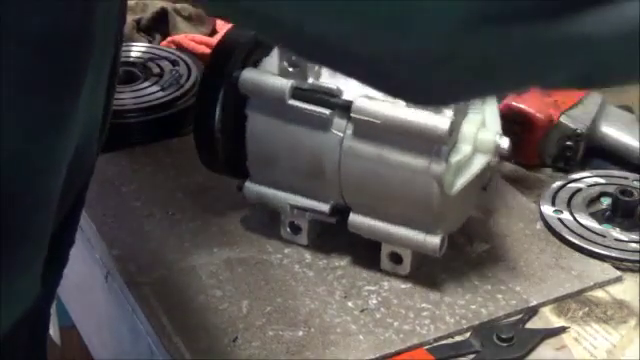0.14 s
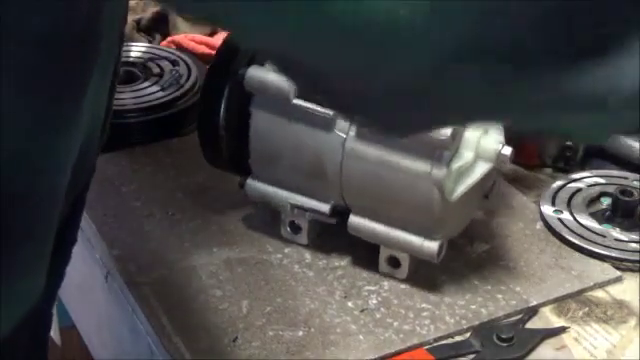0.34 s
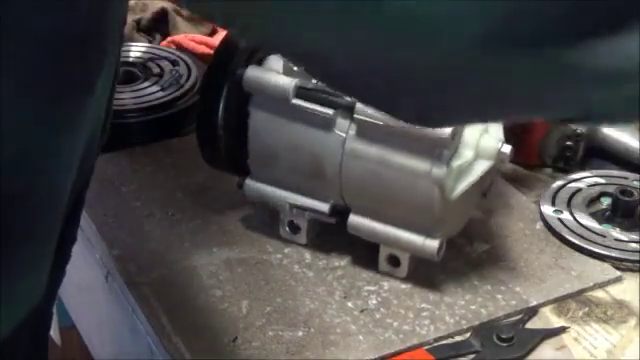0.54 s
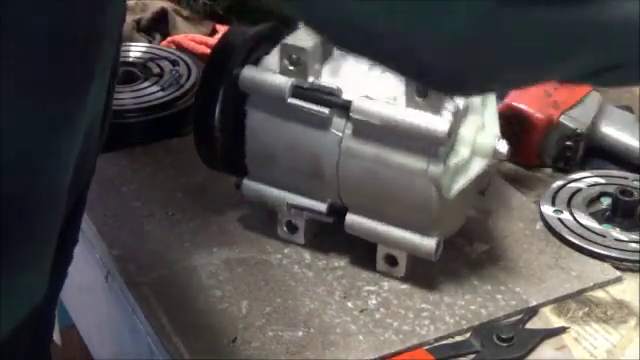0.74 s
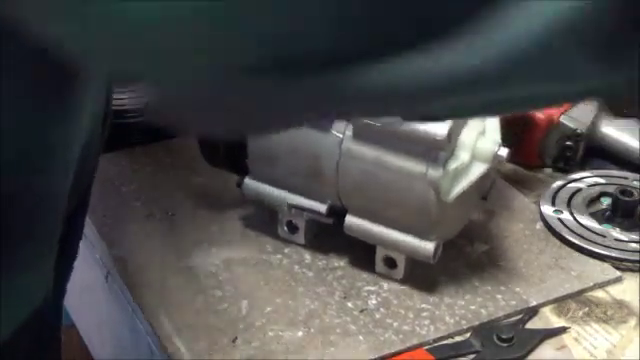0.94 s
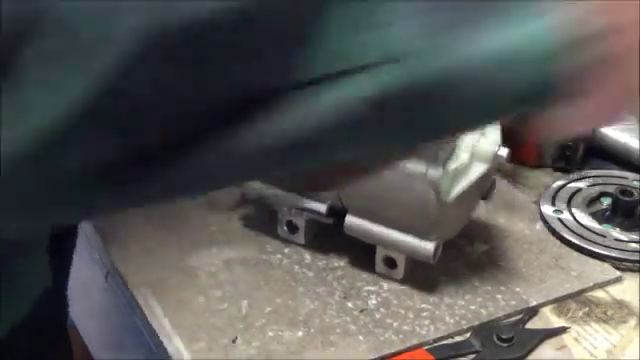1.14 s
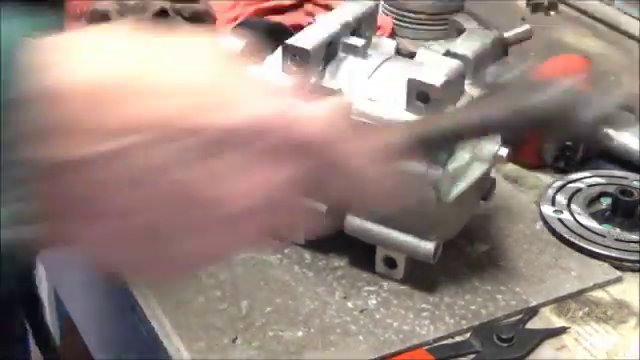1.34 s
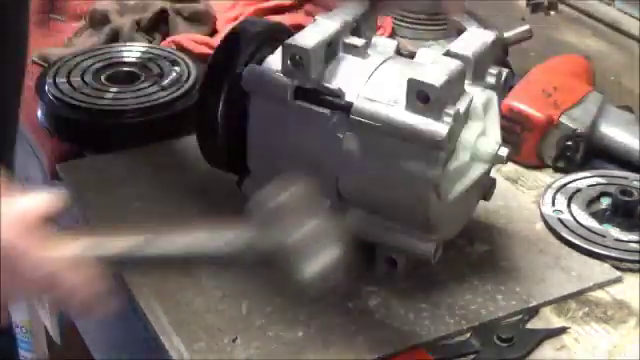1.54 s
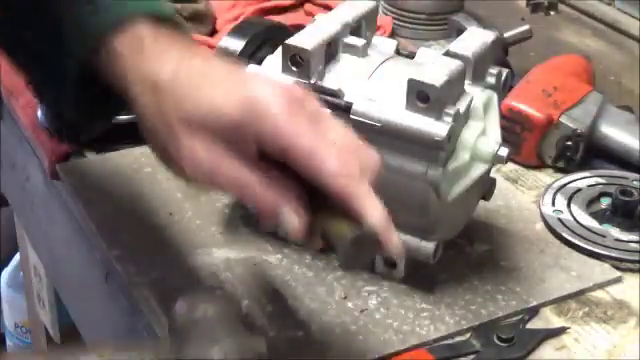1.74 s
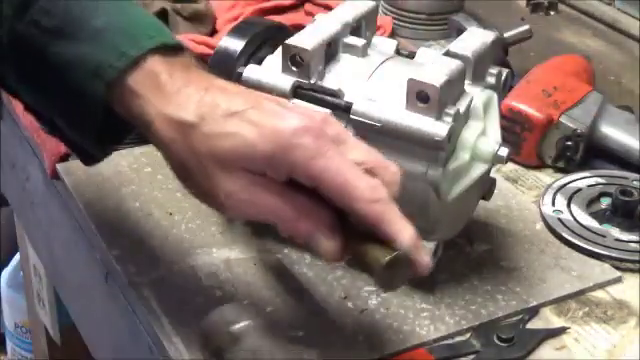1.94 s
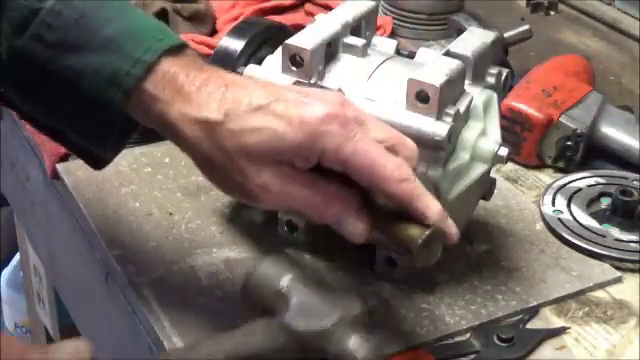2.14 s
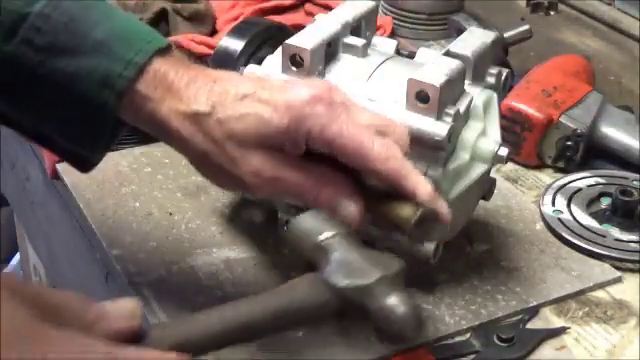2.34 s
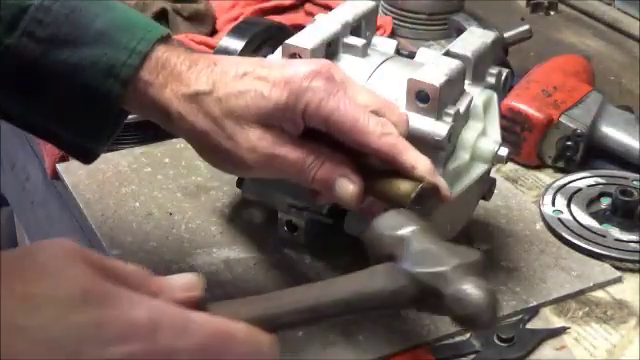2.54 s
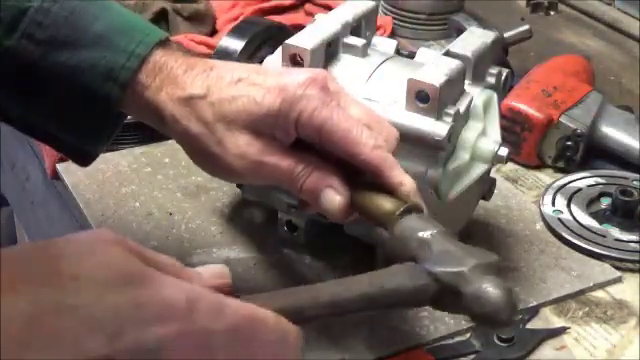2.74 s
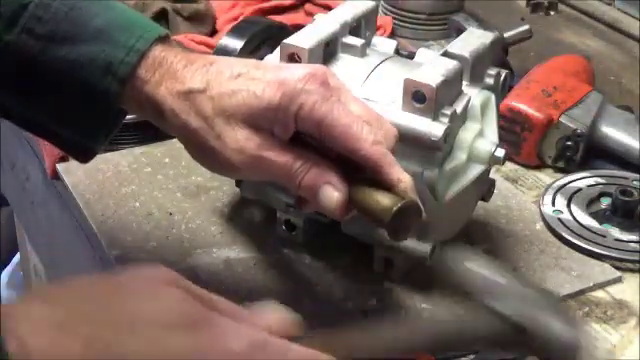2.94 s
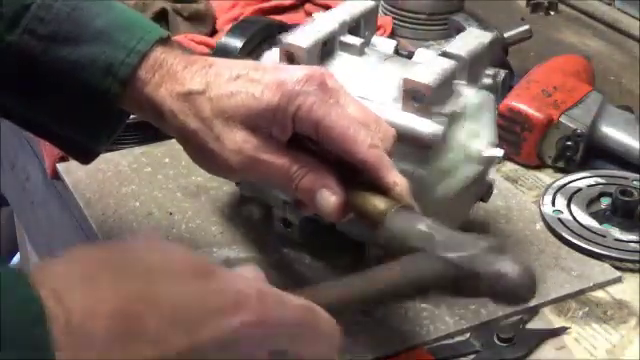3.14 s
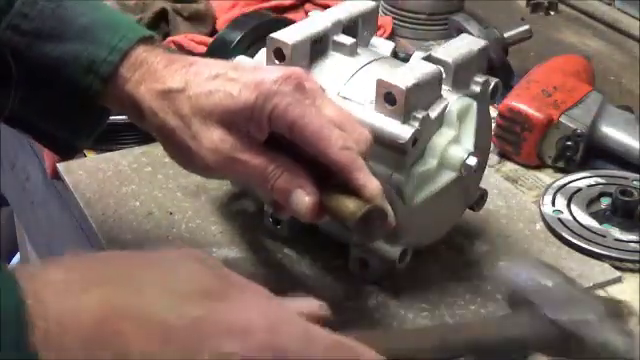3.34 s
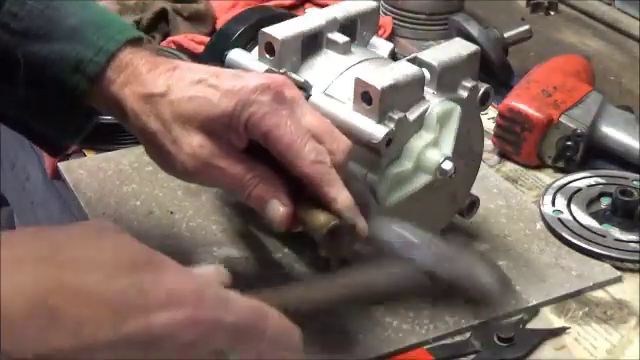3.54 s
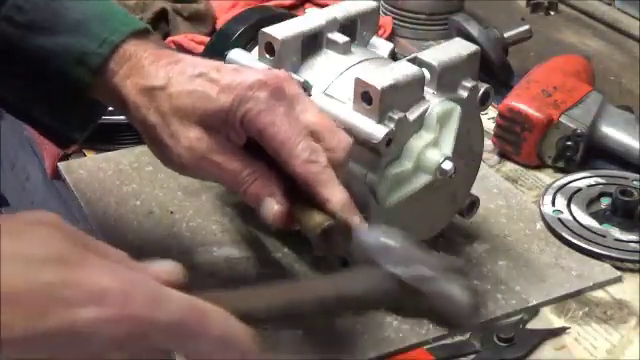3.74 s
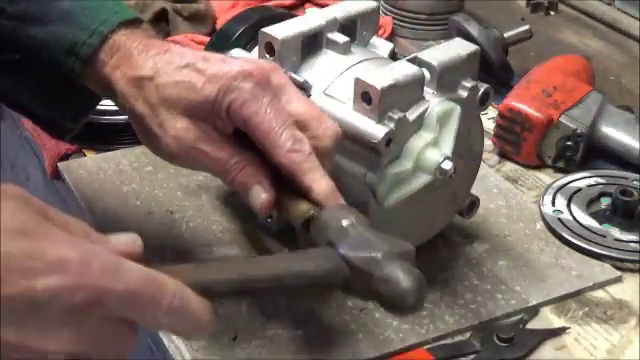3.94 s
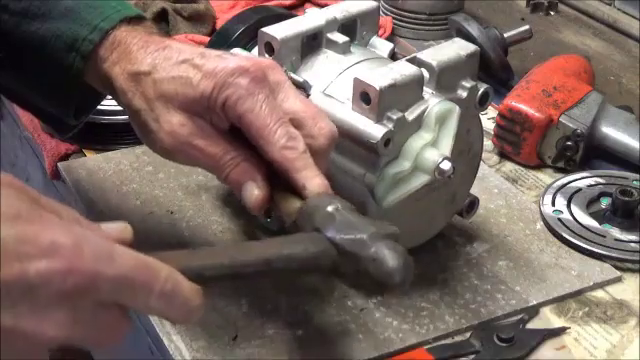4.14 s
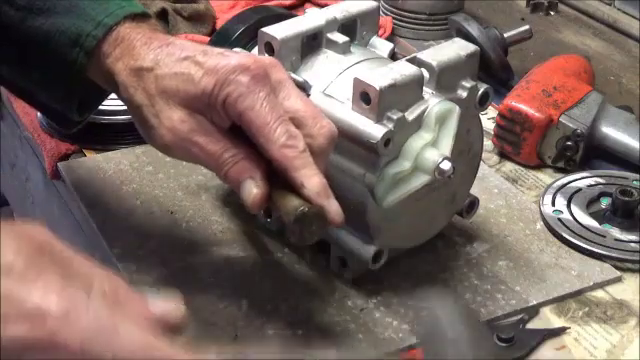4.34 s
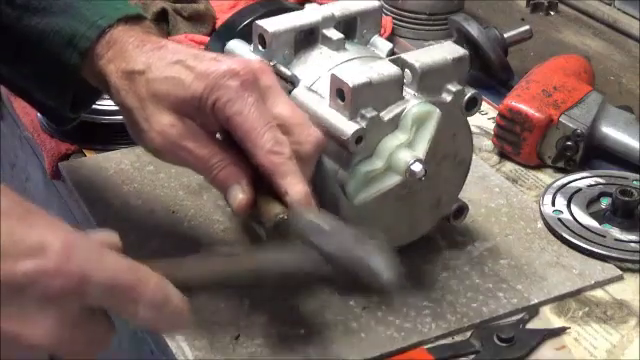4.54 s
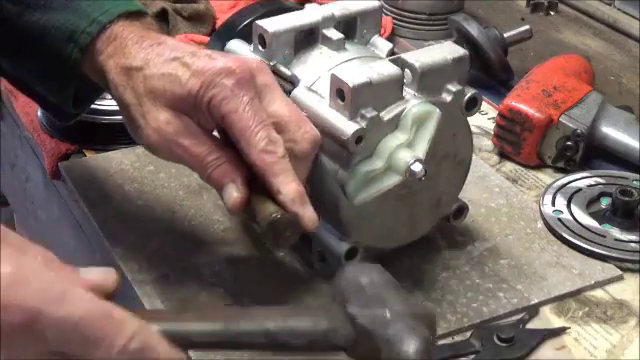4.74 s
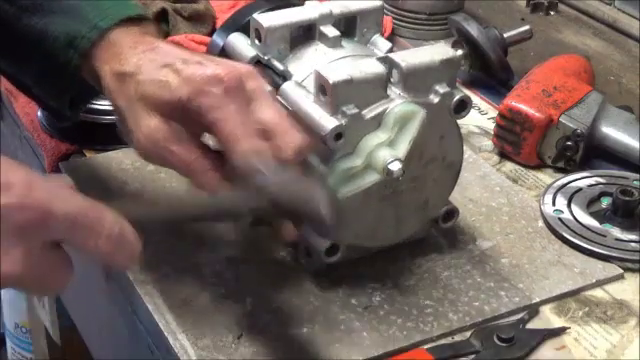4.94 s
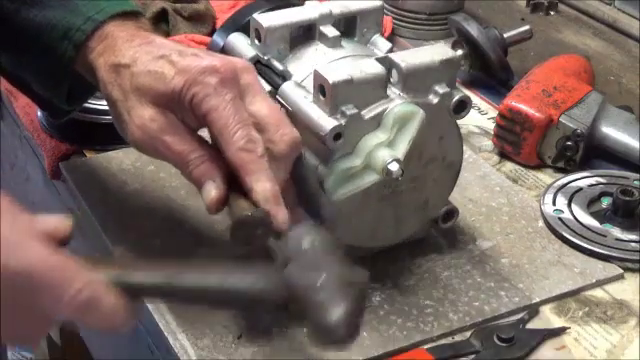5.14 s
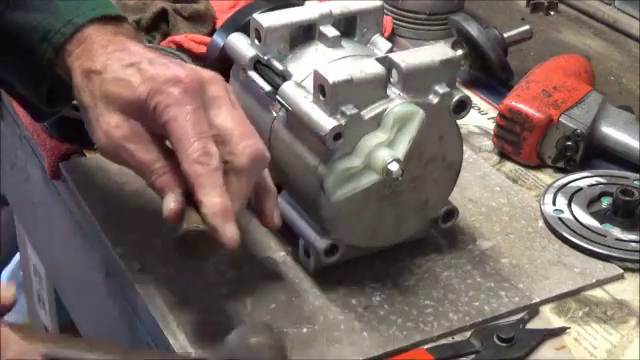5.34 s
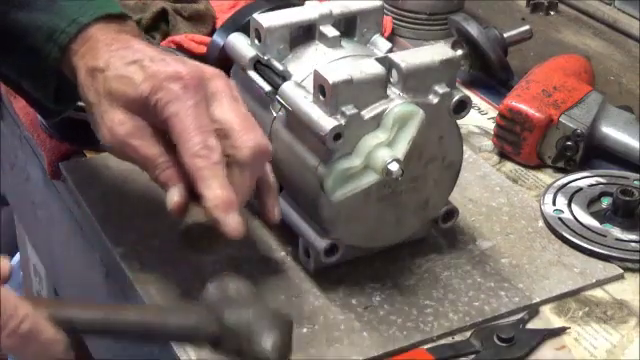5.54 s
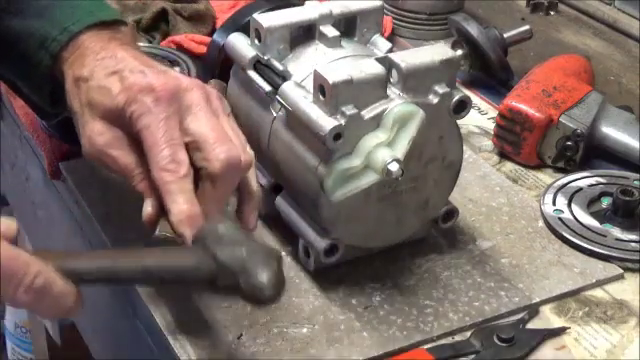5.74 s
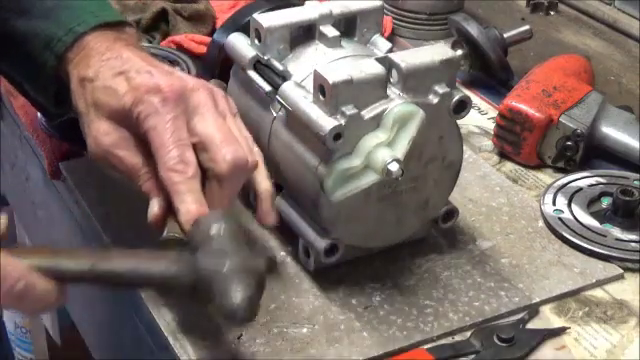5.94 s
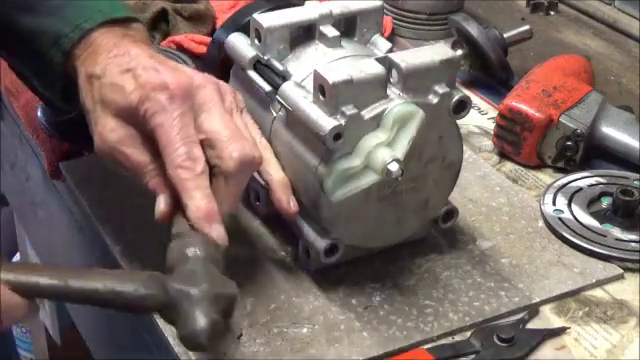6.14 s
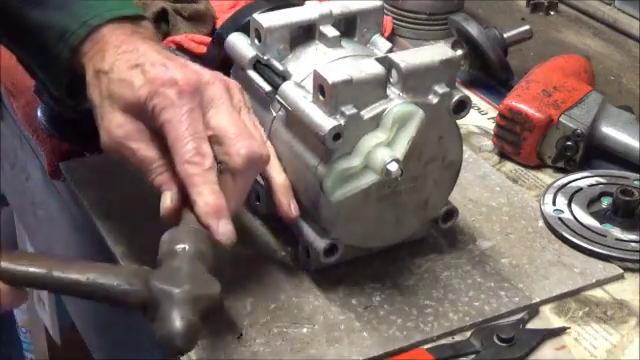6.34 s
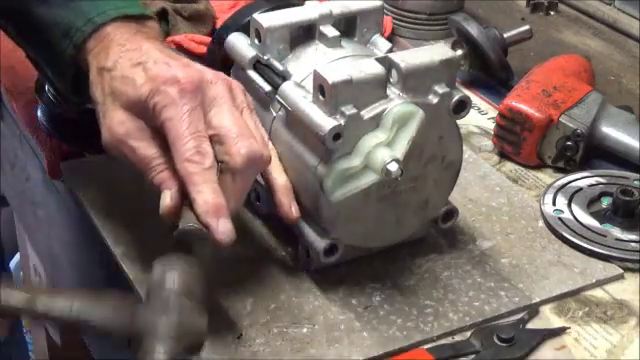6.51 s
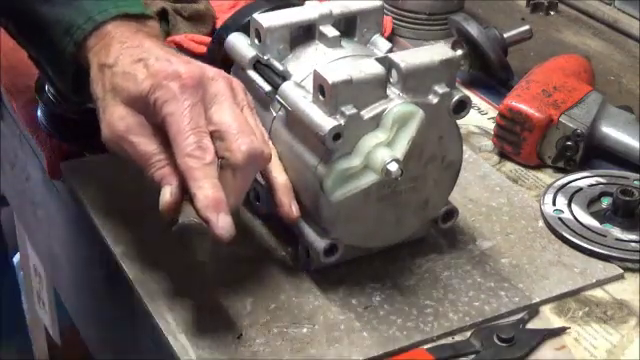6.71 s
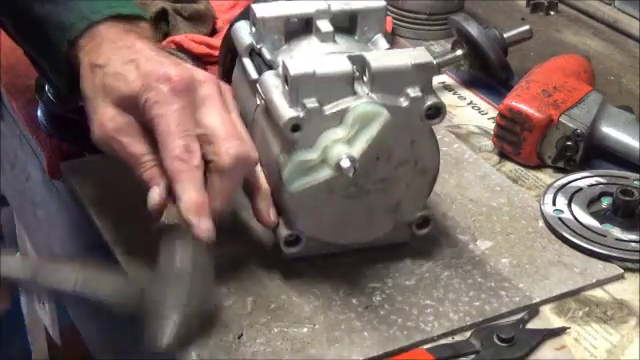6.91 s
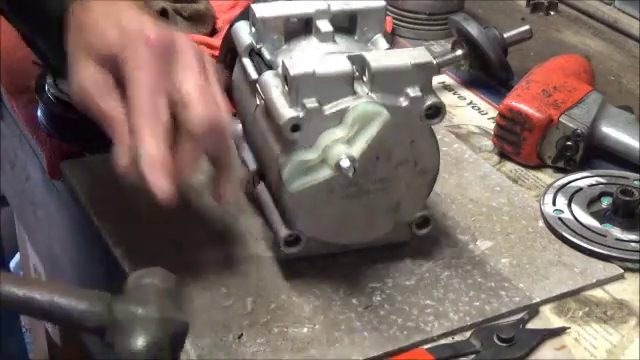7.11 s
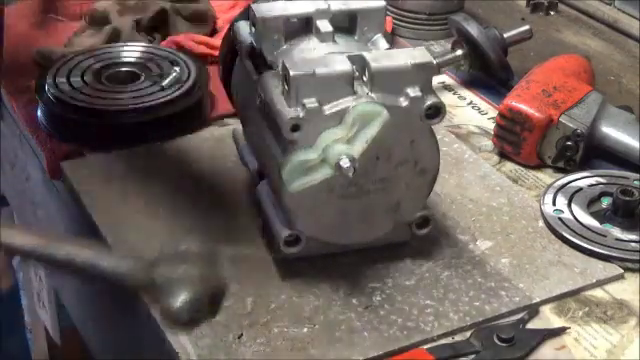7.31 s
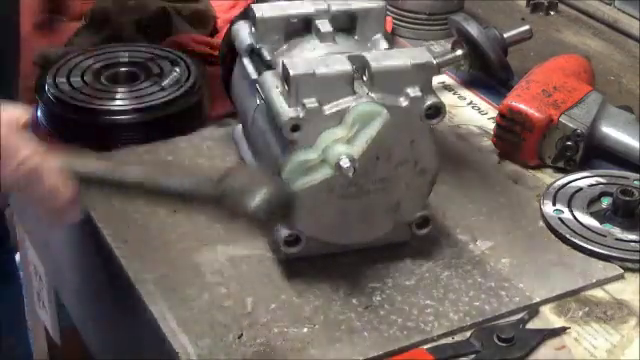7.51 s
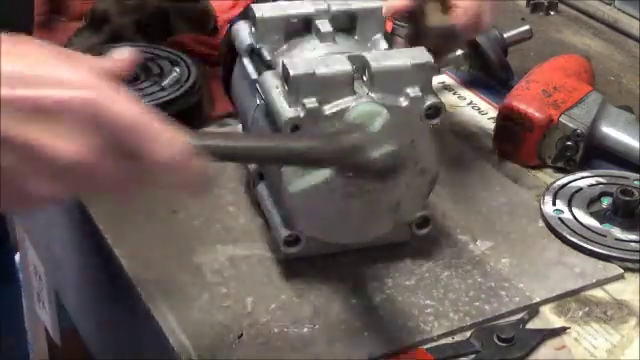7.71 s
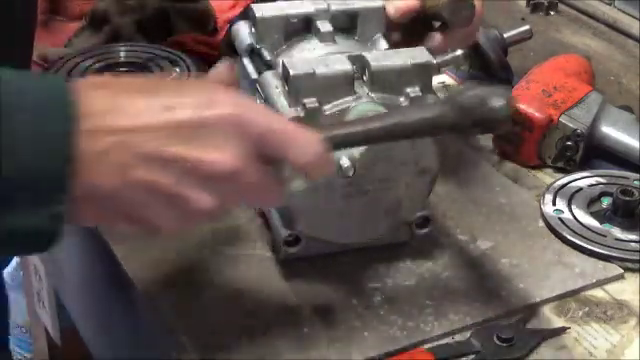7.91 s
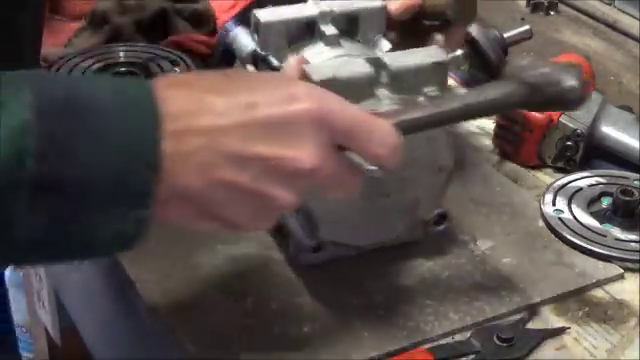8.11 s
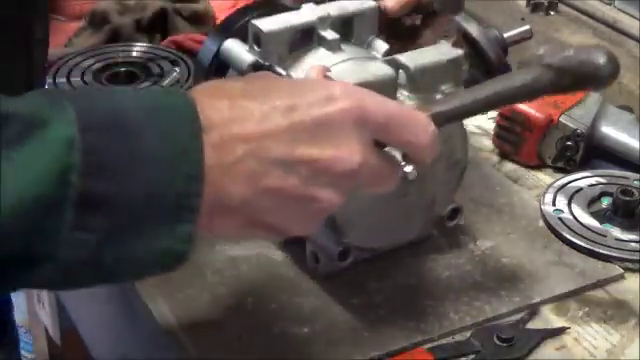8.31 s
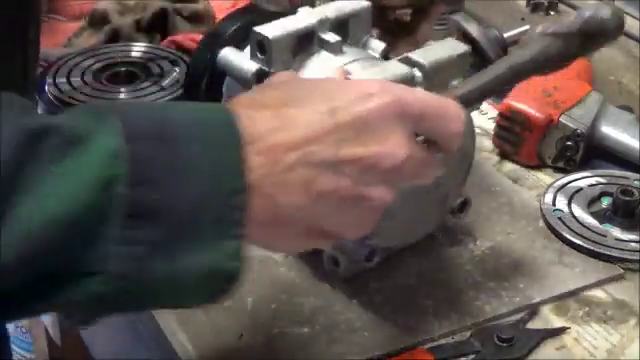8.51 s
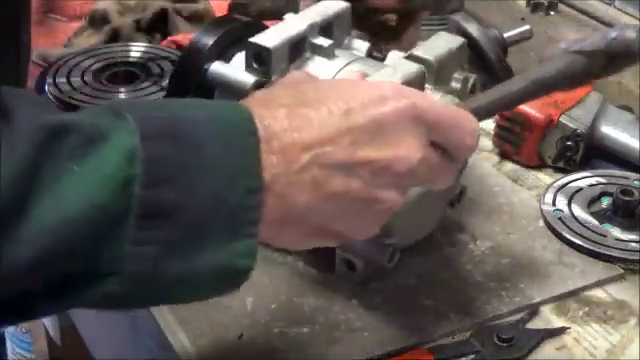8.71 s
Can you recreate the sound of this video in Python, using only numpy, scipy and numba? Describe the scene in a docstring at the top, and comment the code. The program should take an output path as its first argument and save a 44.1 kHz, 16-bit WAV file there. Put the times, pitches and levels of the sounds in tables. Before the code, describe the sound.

A steel hammer strikes a hand-held brass punch against an aluminium housing, each blow a sharp clack with a short, high ring. Three quick blows come first, then a pause with faint handling, then uneven hard and light taps. The housing knocks on the bench and sleeves rustle softly. Finally the housing is shoved along with a scrape. The sound is close, in a small workshop with a soft rush of air.

```python
"""In a workshop, a steel hammer taps a hand-held brass punch against an aluminium compressor housing.
Each impact excites the housing's dense, damped modes (a clack) and the punch's sparse ones (a ring);
a steel pulley rings with the early blows. The housing knocks on the bench, sleeves rustle, the grip ticks,
the punch scrapes and at last the housing is shoved along, all over a soft rush of air and a low hum.
A fast limiter flattens the hard blows, so the room swells up behind them as it lets go."""
import sys
import numpy as np
from scipy import signal
from scipy.fft import rfft, irfft, next_fast_len
from scipy.io import wavfile
from scipy.ndimage import minimum_filter1d
from numba import njit

SR = 44100
rng = np.random.default_rng(int(sys.argv[2]) if len(sys.argv) > 2 else 0)


def wrap_up_sound(samples):
    """Save the sound to the file named by the first command line argument, as 16-bit audio."""
    columns = np.atleast_2d(samples).T
    # keep every value between -1 and 1, then stretch to whole-number steps
    tamed = np.clip(columns, -1, 1)
    steps = np.round(tamed * 32767).astype(np.int16)
    wavfile.write(sys.argv[1], SR, steps)


N = 386757
TIME = np.arange(N) / SR
AGE = TIME[:SR // 2]  # seconds since an impact


def from_db(db):
    """Amplitude ratio: a factor of ten per 20 dB."""
    return 10 ** (np.asarray(db) / 20)


def rms_one(x):
    """Normalisation to unit mean power."""
    return x / np.sqrt(np.mean(x ** 2) + 1e-20)


def at_hz(points, hz):
    """Interpolation of (frequency_hz, value) points on a logarithmic frequency axis."""
    known_hz, values = np.transpose(points)
    return np.interp(np.log(hz + 1e-6), np.log(known_hz), values)


def noise(spectrum, size):
    """Random phases under a given magnitude spectrum make steady noise; rms 1."""
    hz = np.arange(size // 2 + 1) * SR / size
    phasors = np.exp(2j * np.pi * rng.random(len(hz)))
    return rms_one(irfft(from_db(at_hz(spectrum, hz)) * phasors, size))


# Stereo width of diffuse sound, side re mid: frequency_hz, side_db
DIFFUSE_WIDTH = [(100, -36), (250, -22.5), (500, -15.5), (1000, -11), (2500, -7.5), (8000, -10.5),
                 (15000, -20.5)]

def diffuse(spectrum, size):
    """Diffuse field: noise from all round is alike in both channels in the bass, less so in the treble."""
    length = next_fast_len(size, True)
    hz = np.arange(length // 2 + 1) * SR / length
    side = irfft(rfft(noise(spectrum, length)) * from_db(at_hz(DIFFUSE_WIDTH, hz)), length)
    return (noise(spectrum, length) + side * np.array([[1], [-1]]))[:, :size]


def flutter(per_s, size=N):
    """Random modulation: straight lines between standard normal values."""
    knots = np.arange(0, size / SR + 1, 1 / per_s)
    return np.interp(TIME[:size], knots, rng.standard_normal(len(knots)))


def fade(t60):
    """Exponential damping: the amplitude falls 60 dB in t60 seconds."""
    return np.exp(-np.log(1000) * AGE / max(t60, 1e-4))


def ring(modes):
    """Free vibration: one damped sine for each (pitch_hz, level_db, t60_s) row."""
    return sum(from_db(db) * fade(t60) * np.sin(2 * np.pi * hz * AGE) * rng.choice([-1, 1])
               for hz, db, t60 in modes)


def soft_contact(hz, bright_hz):
    """A contact of finite duration is a low-pass filter: it excites little above bright_hz."""
    return 1 / np.sqrt(1 + (hz / bright_hz) ** 4)


def burst(spectrum, bright_hz, t60):
    """Modal overlap: countless modes struck at once merge into dying noise, starting near rms 1."""
    hz = np.arange(len(AGE) // 2 + 1) * SR / len(AGE)
    phases = np.angle(rfft(rng.standard_normal(len(AGE)) * fade(t60)))
    magnitudes = from_db(at_hz(spectrum, hz)) * soft_contact(hz, bright_hz)
    dying = irfft(magnitudes * np.exp(1j * phases), len(AGE)) * fade(10 * t60)
    return rms_one(dying) * np.sqrt(np.mean(fade(t60) ** 2))


def resonate(x, hz, width_hz):
    """Forced response of one resonance, with unit gain at its peak."""
    return signal.lfilter(*signal.iirpeak(hz, hz / width_hz, fs=SR), x)


def strokes(rows):
    """Incoherent sounds add in power: the joint gain of strokes that swell, hold and die away."""
    power = np.zeros(N)
    for start_s, rise_s, hold_s, release_t60, db in rows:
        swell = np.clip((TIME - start_s) / max(rise_s, 1e-3), 0, 1) ** 2
        let_go = np.clip((TIME - start_s - rise_s - hold_s) / max(release_t60, 1e-3), 0, 2)
        power += (swell * from_db(db - 60 * let_go)) ** 2
    return np.sqrt(power)


def add(track, start_s, sound):
    """Superposition of a sound on the track; one that starts before zero leaves only its tail."""
    start = round(start_s * SR)
    sound, start = sound[..., max(-start, 0):], max(start, 0)
    track[..., start:start + sound.shape[-1]] += sound[..., :N - start]


# Reverberation time of the workshop: frequency_hz, t60_s
REVERB_TIMES = [(100, 0.36), (500, 0.38), (2000, 0.29), (5000, 0.27), (9000, 0.27), (15000, 0.16)]

def room(x, first_echo_s=0.0091, build_s=0.00067):
    """Reverberation: dense echoes build up fast and die sooner in the treble; new ones at each call."""
    spectrum = rfft(diffuse([(20, 0), (20000, 0)], len(AGE)))
    hz = np.arange(spectrum.shape[1]) * SR / len(AGE)
    centres_hz = np.array(REVERB_TIMES)[:, 0]
    echoes = 0
    for (_, t60), weights in zip(REVERB_TIMES, np.eye(len(centres_hz))):
        band = irfft(spectrum * at_hz(np.c_[centres_hz, weights], hz), len(AGE))
        echoes = echoes + band * fade(t60)
    onset = 1 - np.exp(-np.maximum(AGE - first_echo_s, 0) / build_s)
    response = rms_one(echoes * onset) / np.sqrt(len(AGE))
    return signal.fftconvolve(x[None], response, axes=1)[:, :len(x)]


def lingering(hz, t60, waver_db=5.5, waver_rad=1.3, spread_rad=0.55):
    """Interference: the echoes of a pure ring pile up, waver and die with the room."""
    room_t60 = at_hz(REVERB_TIMES, hz)
    t60 = min(t60, room_t60 / 2)
    piled = np.sqrt(np.abs(fade(room_t60) ** 2 - fade(t60) ** 2) * t60 / (room_t60 - t60))
    swell, drift, apart = (flutter(per_s, len(AGE)) for per_s in (90, 45, 40))
    phase = 2 * np.pi * hz * AGE + waver_rad * drift + spread_rad * apart * np.array([[1], [-1]])
    return piled * from_db(waver_db * swell) * np.cos(phase)


# Spectrum of the struck housing: frequency_hz, level_db
CLACK_SPECTRUM = [(60, -46), (300, -23), (600, -9), (1200, -8.5), (1900, -0.5), (3500, 5.5), (4400, -1),
                  (5200, 4), (6900, -4.5), (9300, 4.5), (10600, -5), (12800, -1.5), (13400, -34),
                  (16000, -32)]
# Weaker modes of punch and hammer head, re the clack: pitch_hz, level_db, t60_s
WEAK_MODES = [(2768, -18, .06), (5130, -22, .025), (7580, -17, .015), (8475, -18, .05), (8570, -15, .05),
              (9720, -17, .02), (11730, -29, .035), (12270, -24, .045)]
# Modes of the bench top: pitch_hz, level_db, t60_s
BENCH_TOP_MODES = [(78, -34.5, .15), (134.7, -2.5, 0.047), (200, -30, 0.056), (263, -15, 0.19)]

def housing_clack(blow_db, clack_t60=0.027, contact_s=0.00095, thump_db=-43.5):
    """Impact excitation of housing, tools and bench: a harder blow is shorter in contact, so brighter."""
    bright_hz = 10000 * 2 ** ((blow_db - 8.5) / 19)  # an octave higher per 19 dB
    weak = [(hz, db + 20 * np.log10(soft_contact(hz, bright_hz)), t60) for hz, db, t60 in WEAK_MODES]
    contact = (1 - np.exp(-AGE / contact_s)) ** 2  # the force swells as the face flattens on the brass
    housing = burst(CLACK_SPECTRUM, bright_hz, clack_t60)
    return (housing + ring(weak) + from_db(thump_db) * ring(BENCH_TOP_MODES)) * contact


def gripped_mode(hz, t60, after_t60, after_db=-39, bloom_s=0.0022, detune=0.00032, room_db=-12.0):
    """Damping: the grip shortens and slightly detunes a mode; a faint ring escapes, and echoes linger."""
    hz = hz * (1 + detune * rng.normal())
    dying = fade(t60) + from_db(after_db) * fade(after_t60)
    direct = (1 - np.exp(-AGE / bloom_s)) * dying * np.sin(2 * np.pi * hz * AGE)
    return direct + from_db(room_db) * lingering(hz, t60)


# Bending modes of the punch: pitch_hz, level_db, t60_ratio (re grip_t60_s)
PUNCH_BENDING = [(2792, -10, 1.42), (5322, 0, 1.23), (8512, -5, 1.15)]
# The punch's lengthwise mode, then the hammer head's ping: pitch_hz, t60_ratio
LENGTHWISE_AND_HEAD = [(6371, 1.34), (12702, 0.6)]
# Blows on the punch, with mode levels re the clack:
# start_s, level_db, grip_t60_s, bending_db, tilt_db_per_octave, lengthwise_db, head_db
HAMMER_BLOWS = [ (-0.135, 8, 0.067, -6, 6, -6, -12), (0.1418, 5.5, 0.055, -3.5, 11, -0.5, 2),
                (0.41, 7.5, .085, -.5, 0.5, -15, -11), (0.6756, 6, 0.078, 0.5, 8, -15.5, -15.5),
                (1.966, -36, 0.052, 6.5, -7, -26, -18), (2.095, -46, 0.036, 4.5, -14, -14, -18),
                (2.195, -41, 0.03, 3, -13, -6, -22), (2.7962, -8.5, 0.048, -2.5, -13, -31.5, -8),
                (3.1721, 9.5, 0.14, -4, 8, -21.5, -23), (3.4599, 9.5, 0.16, 1, 3.5, -20.5, -10),
                (3.9594, -25.5, 0.054, -20, -8, -36, -31), (4.0538, -11.5, 0.12, -12, -6.5, -34, -22),
                (4.497, 15, 0.11, -8, 8.5, -8.5, -16), (4.9391, 11, 0.13, 0, 0.5, -20.5, -20.5),
                (5.55, -31, .12, -23, 12, -25, -40), (6.218, -19.5, 0.031, 0, -13, -26, -22),
                (6.8132, 16, 0.062, -6.5, -2.5, -5.5, -7.5)]

def hammer_blows(room_db=-8.0, after_t60=0.35):
    """Modal superposition: each blow is a clack and a ring; where the face lands sets the modes' mix."""
    out = np.zeros((2, N))
    middle_hz = PUNCH_BENDING[1][0]
    for start_s, db, grip_t60, bending_db, tilt_db, *single_db in HAMMER_BLOWS:
        clack = housing_clack(db)
        # arms and hammer move between blows, so each has echoes of its own
        blow = clack + from_db(room_db) * room(clack)
        modes = [(hz, mode_db + bending_db + tilt_db * np.log2(hz / middle_hz), ratio)
                 for hz, mode_db, ratio in PUNCH_BENDING]
        modes += [(hz, mode_db, ratio) for (hz, ratio), mode_db in zip(LENGTHWISE_AND_HEAD, single_db)]
        for hz, mode_db, ratio in modes:
            blow += from_db(mode_db) * gripped_mode(hz, grip_t60 * ratio, after_t60 * ratio)
        add(out, start_s, from_db(db) * blow)
    return out


# Level of the workshop air: time_s, level_db
AIR_LEVELS = [(0.0, -44), (0.39, -47), (1.05, -51.5), (2.02, -50), (2.69, -46.5), (3.37, -49.5),
              (3.69, -53), (4.57, -47), (4.96, -45.5), (5.2, -50), (6.1, -50), (6.81, -43.5), (7.11, -46.5),
              (8.57, -41), (8.77, -43)]
# Spectrum of the air: frequency_hz, level_db
AIR_SPECTRUM = [(15, -85.5), (25, -63), (120, -10), (157, -15), (236, -11.5), (309, -13.5), (476, -9.5),
                (545, -11.5), (677, -4), (1020, 1), (1130, 0.5), (2000, -4), (5000, -24), (11000, -30),
                (16000, -50.5)]

def workshop_air(hum_hz=128.5, hum_db=-73.5):
    """Ambient noise: a diffuse mid-range rush and a faint, low pure tone."""
    rush = from_db(np.interp(TIME, *np.transpose(AIR_LEVELS))) * diffuse(AIR_SPECTRUM, N)
    return rush + from_db(hum_db) * np.sin(2 * np.pi * hum_hz * TIME)


# Spectrum of the housing hitting the bench: frequency_hz, level_db
KNOCK_SPECTRUM = [(80, -20), (250, -19), (450, -2), (620, -1.5), (850, 0.5), (1300, -0.5), (1800, 3.5),
                  (3300, -3), (4500, -7), (7000, -25), (15000, -23)]
# Knocks on the bench: start_s, level_db, bright_hz, thump_db (re the knock)
BENCH_KNOCKS = [(0.0214, -19, 4000, -11.5), (0.2262, -13.5, 4620, -21), (0.265, -15, 3490, -13),
                (0.4957, -17.5, 3120, -19), (0.5318, -25, 3470, -6.5), (0.761, -18.5, 2470, -15),
                (0.7948, -12, 4700, -20), (2.1947, -21.5, 3370, -23), (2.828, -16, 3920, -24.5),
                (3.235, -36.5, 2000, 2.5), (3.51, -38, 2000, 3), (3.9585, -19, 2960, -29),
                (4.0548, -15, 4160, -41.5), (4.0866, -16, 4500, -52), (4.558, -53.5, 1980, -13),
                (5.55, -26, 1600, -23), (5.96, -32.5, 3000, -30), (6.2185, -14, 2800, -44),
                (6.813, -10, 2060, -33), (6.8640, -9, 1375, -12), (7.9022, -10, 3400, -26),
                (8.1190, -25, 5000, -6)]

def housing_knocks(crack_t60=0.0093, rattle_t60=0.077, rattle_db=-13):
    """Impact on a plate: the housing drops back on its lugs with a crack and rattle; the bench booms."""
    out = np.zeros(N)
    onset = 1 - fade(0.0036)
    for start_s, db, bright_hz, thump_db in BENCH_KNOCKS:
        crack = burst(KNOCK_SPECTRUM, bright_hz, crack_t60)
        rattle = from_db(rattle_db) * burst(KNOCK_SPECTRUM, bright_hz, rattle_t60)
        thump = from_db(thump_db) * ring(BENCH_TOP_MODES)
        add(out, start_s, from_db(db) * (crack + rattle + thump) * onset)
    return out


# Rings of the pulley: start_s, level_db
PULLEY_RINGS = [(0.1412, -46), (0.4107, -24.5), (0.6758, -27)]

def pulley(pitch_hz=1033, t60=0.33):
    """Sympathetic vibration: the steel pulley sounds one clear note with the early blows."""
    out = np.zeros(N)
    for start_s, db in PULLEY_RINGS:
        add(out, start_s, ring([(pitch_hz, db, t60)]))
    return out


# Spectrum of cloth sliding over cloth: frequency_hz, level_db
CLOTH_SPECTRUM = [(500, -13), (2000, -0.5), (4000, -2.5), (6500, -3), (10000, 2), (13000, -4.5),
                  (16000, -18)]
# Strokes of a sleeve: start_s, rise_s, hold_s, release_t60_s, level_db
SLEEVE_STROKES = [ (1.47, 0.061, 0.058, 0.21, -48.5), (1.70, 0.0097, 0.022, 0.22, -39),
                  (1.80, 0.14, 0.87, 2.0, -64.5), (4.08, 0.11, 0.1, .7, -53.5),
                  (6.20, 0.034, 0.041, 0.65, -53.5), (7.40, 0.12, .045, .2, -45),
                  (7.768, 0.019, 0.0059, 0.21, -37), (7.79, 0.033, .16, 0.39, -47.5),
                  (8.15, .08, .1, 1.5, -62)]

def sleeves(fibre_db=4.0, rest_db=-70):
    """Friction noise: cloth fibres slip in fine grains, and the sleeves are never quite still."""
    movement = np.hypot(strokes(SLEEVE_STROKES), from_db(rest_db))
    return movement * diffuse(CLOTH_SPECTRUM, N) * from_db(fibre_db * flutter(per_s=850))


# Spectrum of a dry tick: frequency_hz, level_db
TICK_SPECTRUM = [(1000, -59.5), (3500, 11), (6000, 4.5), (9000, 17), (12000, -0.5), (16000, -16.5)]
# The clearest ticks of handling: start_s, level_db
CLEAR_TICKS = [(2.2422, -45.5), (2.6398, -30.5), (4.2255, -39.5), (5.714, -46), (6.015, -51.5),
               (6.7045, -34.5)]
# The hand settles its grip on the punch: start_s, end_s
GRIP_SHIFTS = [(1.82, 2.34), (4.15, 4.45)]

def handling_ticks(t60=0.024, faint_per_s=18, faint_db=-50.5, spread_db=6.5):
    """Brief transients are broadband: a few clear snaps, and faint random ones while the grip shifts."""
    clear = np.zeros(N)
    for start_s, db in CLEAR_TICKS:
        add(clear, start_s, from_db(db) * burst(TICK_SPECTRUM, np.inf, t60))
    gripping = sum((TIME > start_s) & (TIME < end_s) for start_s, end_s in GRIP_SHIFTS)
    snapping = rng.random(N) < gripping * faint_per_s / SR
    impulses = snapping * from_db(faint_db + spread_db * rng.standard_normal(N))
    return clear + signal.fftconvolve(impulses, burst(TICK_SPECTRUM, np.inf, t60))[:N]


# Spectrum of the rubbing noise: frequency_hz, level_db
RUB_SPECTRUM = [(50, -30.5), (135, -10), (290, -13.5), (450, -0.5), (690, -25), (830, 4.5), (1300, -7.5),
                (1600, -6), (2900, -10.5), (4200, -11.5), (4700, -11), (6500, -16.5), (10000, -16),
                (15000, -35)]
# Metallic resonances that colour it: pitch_hz, width_hz, gain_db
RUB_RESONANCES = [(3196, 34, 13), (4110, 93, 8), (5630, 54, 7.5)]
# Spectrum of the low scuff: frequency_hz, level_db
SCUFF_SPECTRUM = [(60, -40), (140, -12.5), (270, -3.5), (400, 1.5), (640, 11.5), (1000, -9), (3000, -24.5),
                  (15000, -64)]
# A faint rasping hiss, a brief scrape of the punch, then the housing shoved over the bench:
# start_s, rise_s, hold_s, release_t60_s, rub_db, scuff_db, rasp_hz
RUBS_AND_SCRAPES = [ (2.272, 0.038, 0.53, .4, -54.5, -70, 2780),
                    (3.848, 0.078, 0.013, 0.066, -47, -64, 2830), (6.699, 0.08, .02, .1, -71, -42, 2900),
                    (7.407, 0.057, 0.29, .6, -54.5, -55.5, 2980), (7.735, .12, 0.075, 0.62, -36, -44, 3570),
                    (8.11, 0.0071, 0.044, 0.65, -35, -54, 2850), (8.406, .13, 0.17, 0.48, -38.5, -73, 2800)]

def rubs_and_scrapes(catch_db=3.0, lurch_db=1.5, rasp_db=9, rasp_width_hz=700):
    """Stick-slip modulation: noise that catches and lets go drives resonances above a low scuff."""
    catch = from_db(catch_db * flutter(per_s=250) + lurch_db * flutter(per_s=49))
    friction = diffuse(RUB_SPECTRUM, N) * catch
    ringing = sum(from_db(db) * resonate(friction, hz, width) for hz, width, db in RUB_RESONANCES)
    scuff = noise(SCUFF_SPECTRUM, next_fast_len(N, True))[:N] * catch
    out = 0
    for *timing, rub_db, scuff_db, rasp_hz in RUBS_AND_SCRAPES:
        rasp = from_db(rasp_db) * resonate(friction, rasp_hz, rasp_width_hz)
        rub = rms_one(friction + ringing + rasp)
        out = out + strokes([(*timing, 0)]) * (from_db(rub_db) * rub + from_db(scuff_db) * scuff)
    return out


def scene(room_db=-12.5):
    """Direct and reverberant sound add: blows, knocks and handling close by, the workshop around them."""
    small_sounds = housing_knocks() + handling_ticks() + pulley()
    impacts = hammer_blows() + small_sounds + from_db(room_db) * room(small_sounds)
    return impacts + sleeves() + rubs_and_scrapes() + workshop_air()


@njit
def gain_reduction(over_db, attack, release):
    """Envelope following: the reduction in dB jumps up with the overshoot and sinks back slowly."""
    out, held = np.zeros(len(over_db)), 0.0
    for i in range(len(over_db)):
        held += (over_db[i] - held) * (attack if over_db[i] > held else release)
        out[i] = held
    return out


def record(dry, limit_db=-3.0, attack_s=0.0001, release_s=0.018, ceiling=0.93, band_hz=(58, 16100)):
    """Peak limiting with a millisecond of look-ahead, then soft saturation and band limiting."""
    peak = -minimum_filter1d(-np.abs(dry).max(axis=0), size=SR // 500)
    over_db = np.maximum(20 * np.log10(peak + 1e-9) - limit_db, 0)
    attack, release = (1 - np.exp(-1 / (s * SR)) for s in (attack_s, release_s))
    limited = dry * from_db(-gain_reduction(over_db, attack, release))
    rounded = ceiling * np.tanh(limited / ceiling)
    high_pass = signal.butter(4, band_hz[0], "high", fs=SR, output="sos")
    low_pass = signal.ellip(10, .1, 80, band_hz[1], fs=SR, output="sos")
    return signal.sosfilt(low_pass, signal.sosfilt(high_pass, rounded))


dry = scene()
out = record(dry)
wrap_up_sound(out)
```